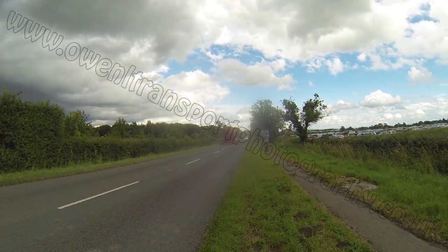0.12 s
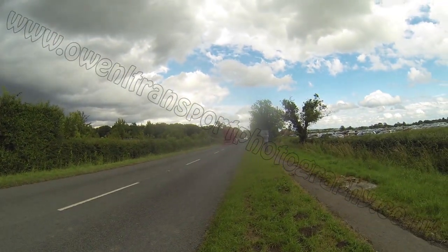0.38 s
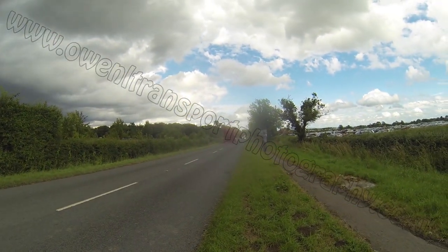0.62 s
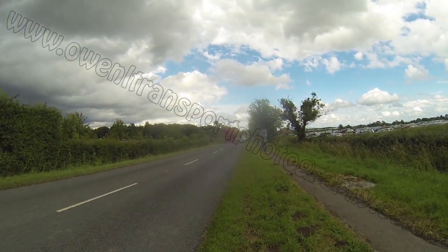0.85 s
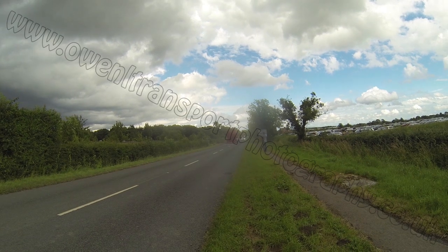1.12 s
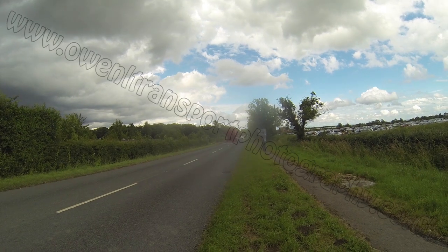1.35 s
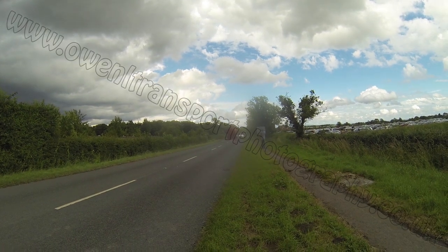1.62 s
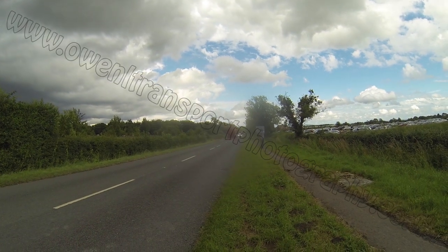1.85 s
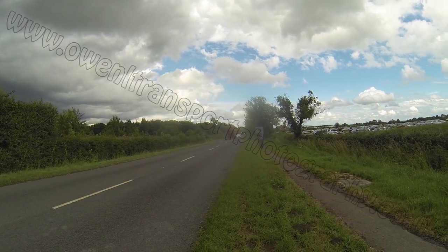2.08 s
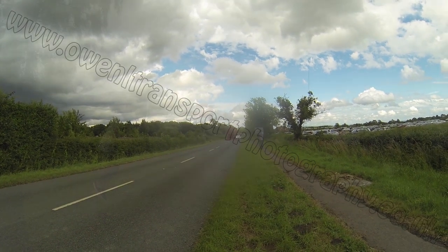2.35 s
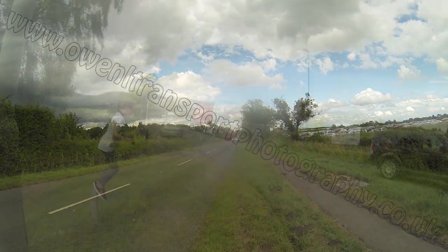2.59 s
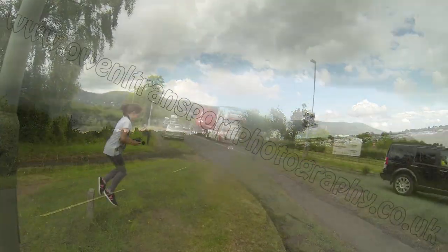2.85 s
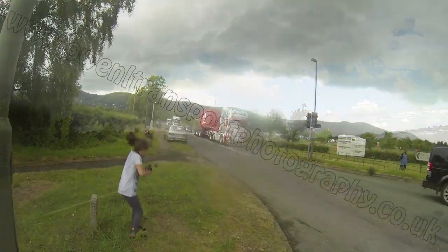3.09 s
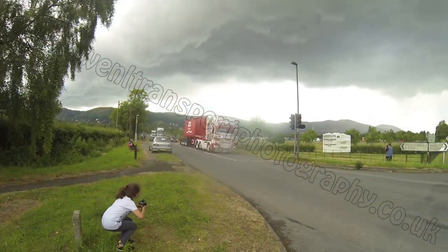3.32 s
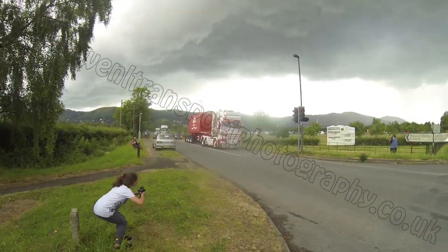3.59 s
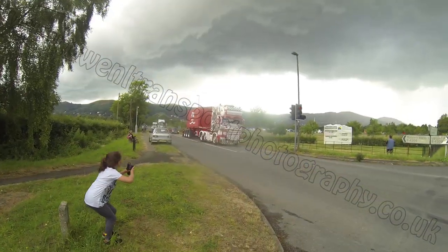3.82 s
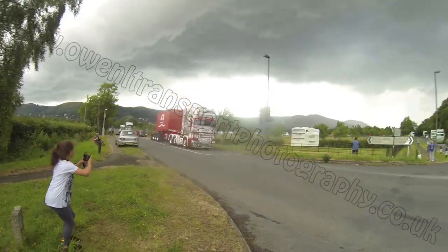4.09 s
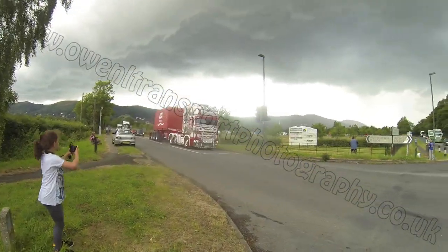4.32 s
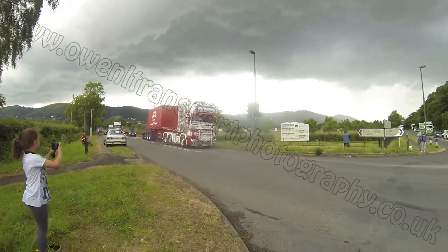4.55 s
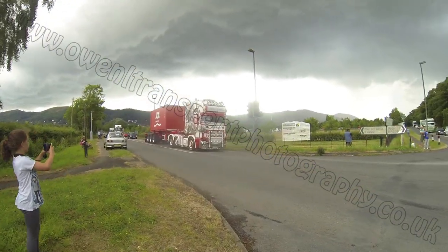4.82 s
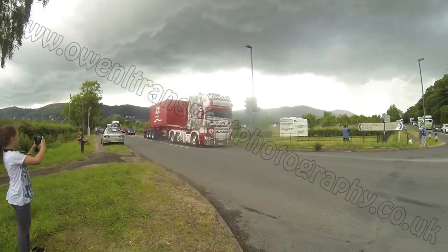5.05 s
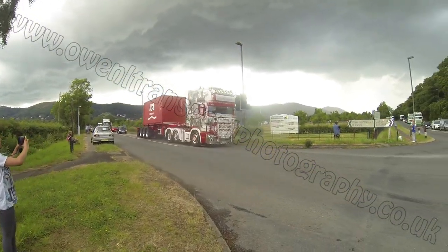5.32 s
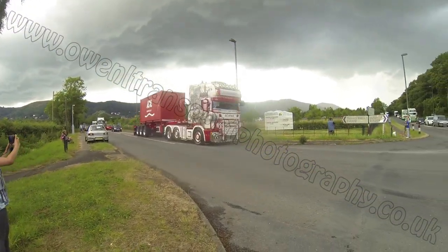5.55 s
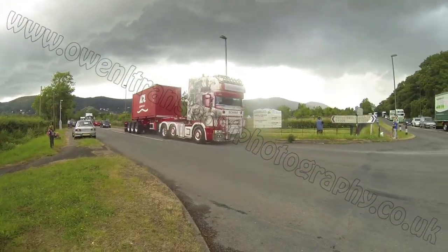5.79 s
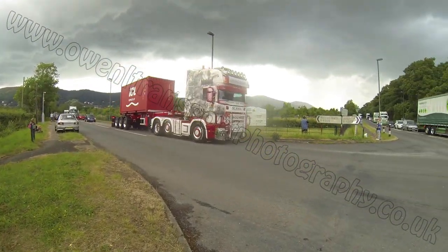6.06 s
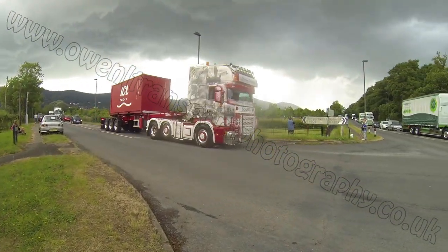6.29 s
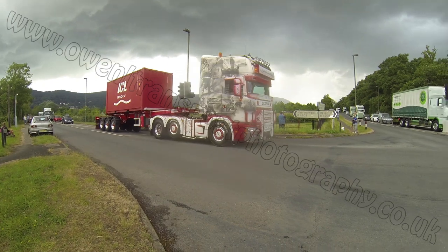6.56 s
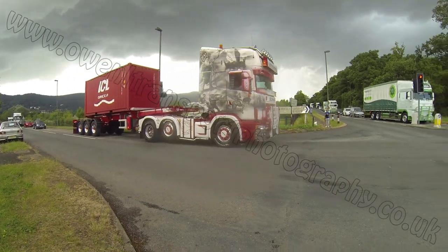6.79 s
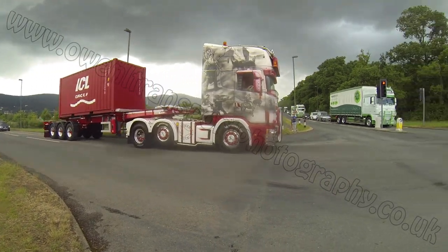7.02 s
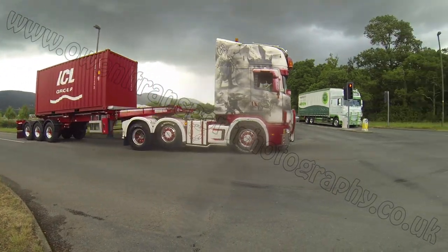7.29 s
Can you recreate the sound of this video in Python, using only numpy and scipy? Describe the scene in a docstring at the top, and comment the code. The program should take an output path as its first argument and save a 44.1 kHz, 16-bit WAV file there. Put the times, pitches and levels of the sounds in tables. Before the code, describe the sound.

Windy roadside with a vehicle rushing away, a brief silent gap, then a V8 diesel lorry pulls off close by, cracking, shifting and roaring again.

```python
"""Country verge, then a V8 lorry pulling off

A quiet verge: wind knocks on the microphone, far traffic and a vehicle rushing away are shaped noise,
and the ticks of a far engine ring two small resonances. After a short silence a V8 diesel lorry pulls off
close by, lifts off, blips the throttle, shifts with a puff of air and pulls again. Pressure fronts timed by
the crank ring its open exhaust stacks, three of the eight cracking sharply; tones locked to the crank hum
under them, and shaped noise makes the gas roar, hiss, hollow drones and turbocharger whoosh."""
import sys
import numpy as np
from scipy import signal
from scipy.fft import rfft, irfft, next_fast_len
from scipy.io import wavfile
from scipy.ndimage import uniform_filter1d, map_coordinates

SR = 44100
rng = np.random.default_rng(int(sys.argv[2]) if len(sys.argv) > 2 else 0)


def wav_record(signal):
    """Record a signal, one row per channel, as 16-bit PCM in the file named by sys.argv[1]."""
    frames = np.transpose(np.atleast_2d(signal))
    bounded = np.clip(frames, -1, 1)
    # unit amplitude maps onto the largest positive 16-bit level
    quanta = np.round(bounded * 32767).astype(np.int16)
    wavfile.write(sys.argv[1], SR, quanta)


def voltage_ratio(decibels):
    """Convert decibels (scalar or array-like) to amplitude ratios, 20 dB per decade."""
    exponent = np.asarray(decibels, float) / 20
    return 10 ** exponent


N = 326781


def unit(x):
    """Scaled to rms 1."""
    return x / np.sqrt(np.mean(x ** 2) + 1e-20)


def along(points, hz):
    """Reads (f/Hz, value) points on a log frequency axis."""
    f, v = np.transpose(points)
    return np.interp(np.log(hz + 1), np.log(f + 1), v)


def curves(rows):
    """One value per sample for each column after the time."""
    s, *cols = np.transpose(rows)
    return [np.interp(np.arange(N) / SR, s, c) for c in cols]


def swell(rows):
    """Gain of events that rise, hold and fall in straight dB lines."""
    t = np.arange(N) / SR
    gain = 0
    for full_at, hold, db, rise, fall in rows:
        before = np.clip(full_at - t, 0, None)
        after = np.clip(t - full_at - hold, 0, None)
        gain = gain + voltage_ratio(db - rise * before - fall * after)
    return gain


def wobble(rate):
    """A smooth random curve, rate knots a second."""
    return map_coordinates(rng.standard_normal(int(N * rate / SR) + 4), [np.arange(N) * rate / SR])


def filtered(x, response):
    """x times a complex response of frequency."""
    m = next_fast_len(N + SR // 2)
    return irfft(rfft(x, m) * response(np.fft.rfftfreq(m, 1 / SR)), m)[:N]


def modes(table):
    """Causal response of resonances: f/Hz, width/Hz, level/dB."""
    return lambda f: sum(voltage_ratio(db) * 1j * f * w / (c * c - f * f + 1j * f * w) for c, w, db in table)


def patchy_noise(spectrum, patchy_db, gate=1):
    """Coloured noise of rms 1 with patches of random gain in time and frequency."""
    z = signal.stft(gate * rng.standard_normal(N), nperseg=512)[2]
    field = uniform_filter1d(rng.standard_normal(z.shape), size=6, axis=0)
    field = uniform_filter1d(field, size=12, axis=1)
    x = signal.istft(z * voltage_ratio(patchy_db * unit(field)), nperseg=512)[1][:N]
    return unit(filtered(x, lambda hz: voltage_ratio(along(spectrum, hz))))


def fuzzy_tone(hz, blur, steady):
    """A tone of rms 1 whose size and phase wander blur times a second around a steady part."""
    turn = 2 * np.pi * np.cumsum(hz * np.ones(N)) / SR
    return unit((steady + wobble(blur)) * np.cos(turn) + wobble(blur) * np.sin(turn))


# wind colour: f/Hz, relative level per Hz/dB
WIND_COLOUR = [(12, -58), (20, 2.5), (39, -7.5), (125, -10), (168, -22.5), (300, -33.5), (400, -39),
               (520, -62), (880, -120)]
# gusts over the calm wind: t at full strength/s, hold/s, level/dB, rise/(dB/s), fall/(dB/s)
GUSTS = [(0, .4, -27, 50, 50), (.92, 0, -33, 130, 110), (2.26, .11, -38, 150, 110)]


def wind():
    """Turbulence buffets the microphone port, which rounds off the peaks."""
    calm_db = -30.5
    strength = (voltage_ratio(calm_db) + swell(GUSTS)) * voltage_ratio(0.8 * wobble(6) + 1.3 * wobble(22))
    return strength * np.tanh(0.77 * patchy_noise(WIND_COLOUR, patchy_db=-0.5)) / .5


# far traffic colour: f/Hz, relative level per Hz/dB
TRAFFIC_COLOUR = [(120, -6), (200, -10), (303, -9), (430, -14.5), (647, -9), (1540, -16.5), (1810, -19),
                  (2210, -19.5), (4090, -26), (7690, -42), (15000, -59.5)]


def traffic():
    """Far road noise, a coloured bed that drifts slowly in level."""
    return voltage_ratio(-42.5 + 0.67 * wobble(6.1)) * patchy_noise(TRAFFIC_COLOUR, patchy_db=0.5)


# ticks of one cycle of eight: relative level/dB
TICK_PATTERN = [0, -4, -3, -1, -3, -5, -4, -1]


def idling():
    """A far engine: ticks in a repeating pattern, each a 17 ms noise burst, ring two small resonances."""
    tick_hz, start_s = 40, .108
    count = int(PAUSE[0] * tick_hz) + 1
    beat = np.arange(count) - len(TICK_PATTERN) // 2
    luck = rng.standard_normal((count, 2))
    at = np.round((start_s + beat / tick_hz + .001 * luck[:, 0]) * SR).astype(int)
    tick_db = np.take(TICK_PATTERN, beat % len(TICK_PATTERN)) + 1.8 * luck[:, 1]
    ticks = np.bincount(at, voltage_ratio(tick_db), N)
    bursts = signal.fftconvolve(ticks, np.hanning(SR // 60), "same") * rng.standard_normal(N)
    ring = modes([(1810, 150, 8.0), (2010, 41, 4.9)])
    return voltage_ratio(-55.5) * unit(filtered(bursts, lambda f: ring(f) ** 2))


# vehicle rushing away, axle after axle: t at full strength/s, hold/s, level/dB, rise/(dB/s), fall/(dB/s)
AXLES = [(.06, 0.13, -26.5, 396, 27), (.355, 0.03, -33, 300, 150)]
# its colour: f/Hz, relative level per Hz/dB
PASSING_COLOUR = [(70, -22), (120, -2.5), (200, -5.5), (350, -15), (425, -8), (500, -19.5), (615, -8.5),
                  (700, -19), (900, -17), (1950, -18), (2350, -24.5), (3400, -27.5), (5300, -33),
                  (8000, -52.5), (11000, -103)]
# the treble flickers as it goes: t at full strength/s, hold/s, level/dB, rise/(dB/s), fall/(dB/s)
FLICKERS = [(.07, 0.28, -59.5, 899, 148), (.49, .03, -64.5, 301, 124), (.625, .01, -70, 200, 190)]
# colour of the flickers: f/Hz, relative level per Hz/dB
FLICKER_COLOUR = [(6000, -42), (8200, -3), (9200, 1), (10200, -12), (11000, -17), (12800, -16),
                  (15000, -40)]


def passing():
    """Rush of a receding vehicle: coloured noise swelling for each axle, with flickering treble."""
    body = swell(AXLES) * voltage_ratio(0.7 * wobble(30)) * patchy_noise(PASSING_COLOUR, patchy_db=1.3)
    return body + swell(FLICKERS) * patchy_noise(FLICKER_COLOUR, patchy_db=2.2)


# single wind knocks on the port: t/s, peak level/dB, width/s
KNOCKS = [(0.205, -13, 0.0017), (0.918, -15, 0.0061), (2.263, -21, 0.0013), (2.354, -15, 0.0038)]


def knocks():
    """Each knock is one push of pressure with a swing back either side."""
    t = np.arange(N) / SR
    total = 0
    for s, db, width in KNOCKS:
        u = (t - s) / width
        total = total - voltage_ratio(db) * (1 - u ** 2) * np.exp(-.5 * u ** 2)
    return total


# the vehicle's tyres sing: t at full strength/s, hold/s, level/dB, rise/(dB/s), fall/(dB/s)
SINGING = [(.38, 0.18, -48, 40, 40)]


def singing():
    """The tyres sing on as the vehicle leaves: a fixed pitch blurred in size and phase."""
    return swell(SINGING) * fuzzy_tone(1944, blur=350, steady=0)


def verge():
    """Wind, far traffic, a receding vehicle and a far idling engine."""
    return wind() + traffic() + idling() + passing() + knocks() + singing()


# lorry engine speed: t/s, firing rate/Hz
SPEED = [(2.85, 60.19), (3.2, 69.55), (3.5, 82.54), (3.8, 95.44), (4.1, 106.27), (4.35, 117.28),
         (4.55, 125.8), (4.68, 125.9), (5.0, 123.34), (5.36, 96.85), (5.5, 97.65), (5.65, 92.9),
         (5.8, 93.07), (6.0, 97.73), (6.3, 100.9), (6.5, 107.25), (6.8, 114.28), (7.1, 122.01),
         (7.41, 130.32)]


def crank():
    """Engine cycles completed, sample by sample: firing rate summed over time, eight firings a cycle."""
    start = .62  # crank position at the first speed row, in engine cycles
    running = np.arange(N) >= SPEED[0][0] * SR
    return start + np.cumsum(curves(SPEED)[0] * running) / SR / len(CYLINDERS)


# foot on the throttle: t down/s, t up/s, crack level at first/dB, at full boost/dB, boost time constant/s
PULLS = [(2.82, 4.71, -22, -8.5, 0.51), (5.354, 5.455, -9, -3, 0.052), (5.665, 7.5, -9, -6, 0.24)]


def fuel():
    """Pedal share 0-1 and the crack level in dB, which climbs as boost builds."""
    coast_db, pedal_s = -17, 0.024  # crack level with the foot off; how fast the fuel follows the pedal
    t = np.arange(N) / SR
    pedal, crack_db = 0, coast_db
    for on, off, first, full, build in PULLS:
        down = np.clip(np.minimum(t - on, off - t) / pedal_s + .5, 0, 1)
        boosted_db = full + (first - full) * np.exp(-np.clip(t - on, 0, None) / build)
        pedal = pedal + down
        crack_db = crack_db + down * (boosted_db - coast_db)
    return pedal, crack_db


def echoes(x):
    """Road, trailer and hedges send every crack back in the same short scatter."""
    t = np.arange(SR // 4) / SR
    tail = rng.standard_normal(len(t)) * voltage_ratio(-60 * t / 0.2) * (t > .002)
    return signal.fftconvolve(x, tail / np.linalg.norm(tail))[:N]


# firing order: place in the cycle/eighths, relative crack level/dB
CYLINDERS = [(0, 0), (.9, -15), (1.95, -14), (2.95, -20), (4.1, -2), (5.0, -3.5), (5.9, -17), (6.95, -16)]
# stacks swing round as the lorry turns: t/s, first, second, third crack level/dB (by place in the cycle:
# first half, fifth, rest), sharp tip level/dB, metal clatter level/dB, pipe ring level/dB
TURN = [(2.85, 0, 9, -1, -13, -51, -1), (3.7, 0, 3, -1, -6.5, -38, 9), (4.15, 0, 1.5, -1, -9, -46, 9),
        (4.6, -1.5, 2.5, -3.5, -10, -42, 6), (6.2, 0.8, 1.5, 3, -31, -35, 6.5),
        (6.9, -2, 0, 1, -19.5, -25, 8), (7.3, 2.5, -5, 2, -38, -30.5, 8)]
# cracks that rattle the stacks hardest: t/s
RATTLES = [6.654, 6.69, 6.797, 6.832, 6.866, 6.901, 7.069, 7.103, 7.262, 7.325]
# pipe resonances: f/Hz, width/Hz, relative level/dB
PIPE = [(151, 7.2, 2), (162, 11.6, 7.5), (288, 12.3, 3), (356.8, 30, 3), (438.5, 69, -3), (684, 140, -4.5),
        (1120, 370, -5.5)]


def exhaust(cycles):
    """Steep pressure fronts leave the stacks as narrow dips and ring the pipe; returns sound and gas puffs."""
    place, size_db = np.transpose(CYLINDERS)
    when = np.arange(int(cycles[-1]) + 1)[:, None] + place / len(CYLINDERS)
    keep = (when > cycles[0]) & (when < cycles[-1])
    cyl = np.nonzero(keep)[1]
    luck = rng.standard_normal((len(cyl), 3))  # timing, level and clatter of each firing
    at = np.interp(when[keep], cycles, np.arange(N)) + 3 * luck[:, 0]
    at = np.clip(np.round(at).astype(int), 0, N - 1)

    first_db, second_db, third_db, tip_db, clatter_db, ring_db = curves(TURN)
    half = len(CYLINDERS) // 2
    facing_db = np.select([cyl < half, cyl == half], [first_db[at], second_db[at]], third_db[at])
    crack_db = size_db[cyl] + fuel()[1][at] + 0.6 * luck[:, 1] + facing_db
    fronts = np.bincount(at, voltage_ratio(crack_db), N)

    t = np.arange(-300, 301) / SR
    bell = lambda centre, width: np.exp(-.5 * ((t - centre) / width) ** 2)
    spread = lambda shape: signal.fftconvolve(fronts, shape, "same")
    dips = -spread(0.66 * bell(0, 0.00027)) - voltage_ratio(tip_db) * spread(bell(0, 0.000093))
    rebound = voltage_ratio(-7.5) * spread(bell(.003, .001))  # the pressure swings back
    puffs = spread(bell(0, 0.00018) + 0.53 * bell(0.002, 0.0013))

    hard = np.min(np.abs(at[:, None] / SR - np.array(RATTLES)), axis=1) < .003
    uneven_db = np.where(hard, 11, 2.5 * luck[:, 2])  # hard rattles stand over the usual clatter
    ticks = np.bincount(at, fronts[at] * voltage_ratio(clatter_db[at] + uneven_db), N)
    clank = modes([(2560, 910, -1.8), (2790, 3000, -1.2), (4030, 2600, -1.8)])
    clatter = filtered(-ticks, lambda f: clank(f) ** 4)
    ringing = filtered(voltage_ratio(ring_db) * dips, modes(PIPE))
    return clatter + dips + rebound + ringing + voltage_ratio(-1.5) * echoes(dips), puffs


# how well the exhaust passes a clean tone: f/Hz, level/dB
PASSES = [(60, -34), (68, -27.5), (78, -17.5), (85, -21.5), (93, -22.5), (99, -26.5), (110, -16.5),
          (118, -25.5), (126, -25), (134, -12), (143, -20), (170, -17), (195, -36.5), (260, -45)]
# the lorry swings past, lifting the firing tone and its octave: t/s, gain/dB
NEAR = [(2.85, -1.5), (4.6, -1.5), (5.8, 5.5), (6.6, -0.5), (7.2, 10), (7.41, 0.5)]
# off the throttle the two banks pull unevenly and tones beside the firing pitch take over:
# t at full strength/s, hold/s, level/dB, rise/(dB/s), fall/(dB/s)
LOPE = [(4.7, 0.091, -34, 49, 12), (5.3, 0.027, -21.5, 86, 92), (5.6, 0.085, -25, 84, 196)]


def hum(cycles):
    """Tones locked to the crank, louder where the exhaust passes them; the firing tone lags at high speed."""
    octave_db, idle_db = -3, -16  # octave over the firing tone; firing tones with the foot off
    lag_from_hz, lag_per_hz = 104, .007  # lag in cycles of the firing tone for each Hz above this rate
    tone = lambda order, lead: -2 ** .5 * np.cos(2 * np.pi * (order * cycles + lead))
    hz = curves(SPEED)[0]
    gain_db = curves(NEAR)[0] + idle_db * (1 - fuel()[0])
    lead = 0.094 - lag_per_hz * np.clip(hz - lag_from_hz, 0, None)
    firing = voltage_ratio(gain_db + along(PASSES, hz)) * tone(order=8, lead=lead)
    octave = voltage_ratio(gain_db + octave_db + along(PASSES, 2 * hz)) * tone(order=16, lead=-0.22)
    uneven = swell(LOPE) * (tone(order=9, lead=-0.059) + voltage_ratio(-1.0) * tone(order=11, lead=-0.049))
    return firing + octave + uneven


# steady deep rumble: f/Hz, relative level per Hz/dB
GROUND_COLOUR = [(12, -20), (30, 0.5), (55, -1), (90, -19), (200, -100)]


def ground():
    """Steady deep rumble under the lorry: patchy low noise."""
    return voltage_ratio(-34) * patchy_noise(GROUND_COLOUR, patchy_db=3.0)


# gas and tyre flow: t/s, roar level before a 5 dB trim/dB, hiss level/dB
FLOW = [(2.86, -25, -50), (3.1, -21.5, -44.5), (3.44, -18, -42), (4.03, -16.5, -44), (4.23, -24, -50),
        (4.85, -25.5, -57.5), (5.05, -23, -58), (5.31, -22, -49), (5.4, -18, -46), (5.5, -22, -50),
        (5.72, -17.5, -44.5), (5.93, -20.5, -48), (6.09, -21, -50), (6.97, -26, -64), (7.39, -24.5, -56.5)]
# roar colour: f/Hz, relative level per Hz/dB
ROAR_COLOUR = [(25, -9), (50, -10), (80, -7), (130, 0), (240, -16), (320, -11), (430, -7.5), (560, -8.5),
               (900, -10.5), (1400, -16), (1900, -26), (3000, -29), (7000, -45.5), (12000, -89)]
# hiss colour: f/Hz, relative level per Hz/dB
HISS_COLOUR = [(1300, -39), (1800, 1), (2200, 3.5), (3000, -14), (5000, -15.5), (7000, -22.5),
               (10000, -22.5), (15000, -57)]


def roar_and_hiss(puffs):
    """Turbulent gas and tyre noise: the roar flares just behind each crack, the hiss rides on top."""
    roar_db, hiss_db = curves(FLOW)
    flare = 1 + 2.2 * np.roll(puffs, SR // 700)  # trails the front
    roar = voltage_ratio(roar_db - 5) * patchy_noise(ROAR_COLOUR, patchy_db=1.2, gate=flare)
    return roar + voltage_ratio(hiss_db) * patchy_noise(HISS_COLOUR, patchy_db=3.0)


# thin high hiss that swells and fades, then creeps back: t at full strength/s, hold/s, level/dB,
# rise/(dB/s), fall/(dB/s; negative goes on rising)
THIN_HISS = [(3.1, 0.78, -52.5, 20, 34), (5.95, 1, -60, 5, -2.5)]
# thin high hiss colour: f/Hz, relative level per Hz/dB
THIN_HISS_COLOUR = [(3500, -26), (5800, -0.5), (7500, -2), (9300, -3), (11200, -5), (15000, -11.5)]


def thin_hiss():
    """Thin treble noise that swells and fades, as from a car passing nearby, then creeps back."""
    return swell(THIN_HISS) * patchy_noise(THIN_HISS_COLOUR, patchy_db=2.5)


# hollow notes sag as the gas slows after lifting off:
# t/s, low note f/Hz, low note level/dB, high note f/Hz, high note level/dB
SAG = [(4.72, 385, -50, 500, -44), (4.82, 382, -42, 490, -37), (4.91, 377, -28, 443, -35),
       (5.04, 372, -29, 425, -34), (5.16, 363, -29, 432, -39), (5.28, 347, -30, 435, -39),
       (5.36, 345, -42, 435, -45)]


def sagging_notes():
    """Two hollow pipe notes sag in pitch as the gas slows, each blurred in size and phase."""
    low_hz, low_db, high_hz, high_db = curves(SAG)
    during = (np.arange(N) > SAG[0][0] * SR) & (np.arange(N) < SAG[-1][0] * SR)
    low = voltage_ratio(low_db) * fuzzy_tone(low_hz, blur=70, steady=1.5)
    high = voltage_ratio(high_db) * fuzzy_tone(high_hz, blur=90, steady=.3)
    return during * (low + high)


# low throb while coasting: t at full strength/s, hold/s, level/dB, rise/(dB/s), fall/(dB/s)
THROB = [(4.8, 1, -30, 60, 39)]


def throb():
    """A low blurred tone while coasting."""
    return swell(THROB) * fuzzy_tone(78.4, blur=35, steady=.6)


# turbocharger whoosh: t at full strength/s, hold/s, level/dB, rise/(dB/s), fall/(dB/s)
WHOOSH = [(5.2, 0.047, -62, 30, 10), (6.3, 0.49, -42.5, 30, 19)]
# the whoosh slides down: t/s, centre f/Hz, width/log units, lower band relative level/dB
TURBO = [(5.0, 7000, 0.16, -30), (5.6, 6250, 0.11, -24), (6.0, 4600, 0.25, -23), (6.2, 4200, 0.17, -18),
         (6.6, 4160, 0.15, -1), (6.85, 3900, 0.12, -3), (7.15, 3250, 0.25, 0), (7.41, 3020, 0.53, 0)]


def turbo_whoosh(puffs):
    """Two noise bands slide down together, chopped by the cracks ever harder from the last swell on."""
    chop_depth, chop_growth, lower_ratio = 1.3, 0.9, 0.73  # growth exponent per second; lower over upper pitch
    chop = chop_depth * np.exp(chop_growth * np.clip(np.arange(N) / SR - WHOOSH[-1][0], 0, None))
    hz, t, z = signal.stft((1 + chop * puffs) * rng.standard_normal(N), SR, nperseg=512)
    frame_at = np.clip((t * SR).astype(int), 0, N - 1)
    centre_hz, width, lower_db = (c[frame_at] for c in curves(TURBO))
    hump = lambda at_hz: np.exp(-.5 * (np.log((hz[:, None] + 1) / at_hz) / width) ** 2)
    band = hump(centre_hz) + voltage_ratio(lower_db) * hump(lower_ratio * centre_hz)
    band = band / np.sqrt(np.mean(band ** 2, axis=0))
    return swell(WHOOSH) * signal.istft(z * band, SR, nperseg=512)[1][:N]


# hollow low notes in the pipe, through the blip and into the second pull:
# t at full strength/s, hold/s, level/dB, rise/(dB/s), fall/(dB/s)
DRONE = [(5.38, 0.37, -31, 100, 60), (5.75, 0.071, -25, 85, 58)]


def hollow_drone():
    """Gas noise in the pipe sounds its hollow low notes, through the blip and into the second pull."""
    hollow = modes([(376.6, 38.0, 7.5), (413, 120, -25.0), (308, 36, 5.0)])
    return swell(DRONE) * unit(filtered(rng.standard_normal(N), lambda f: hollow(f) ** 2))


# gearbox air valve: t/s, hold/s, t60/s
VALVE = (5.472, .035, .15)


def air_puff():
    """The gearbox valve lets out a jet of bright noise that holds, then dies away."""
    start, hold, t60 = VALVE
    since = np.arange(N) / SR - start
    burst = (since > 0) * voltage_ratio(-46.5 - 60 * np.clip(since - hold, 0, 1) / t60)
    jet = [(5000, -30), (7000, -5), (7800, -3.5), (9000, -12), (15000, -12.5)]  # f/Hz, level per Hz/dB
    return burst * unit(filtered(rng.standard_normal(N), lambda f: voltage_ratio(along(jet, f))))


def lorry():
    """One crank drives the cracks and the hum; their gas puffs shape the roar and whoosh around them."""
    cycles = crank()
    pipe, puffs = exhaust(cycles)
    flow = ground() + roar_and_hiss(puffs) + thin_hiss() + sagging_notes() + throb()
    flow = flow + turbo_whoosh(puffs) + hollow_drone() + air_puff()
    return pipe + hum(cycles) + flow


# silence between the two places: t start/s, t end/s
PAUSE = (2.767, 2.851)


def scene():
    """The verge, a gap, then the lorry fading in over 10 ms."""
    t = np.arange(N) / SR
    fade_in = np.clip((t - PAUSE[1]) / 0.0098, 0, 1)
    return (verge() * (t < PAUSE[0]) + lorry() * fade_in)[None]


def band_limit(x):
    """A steep low-pass at the top of the band."""
    return signal.sosfilt(signal.butter(12, 15170, fs=SR, output="sos"), x)


def record(dry):
    """The microphone drops the deepest bass and the top treble; the loudest cracks flatten near full scale."""
    top, low_hz, high_hz = .99, 18, 15170
    heard = filtered(dry[0], lambda f: (f < high_hz) * 1j * f / (low_hz + 1j * f))
    clipped = heard / (1 + np.abs(heard / top) ** 40) ** (1 / 40)
    return band_limit(clipped[None])


dry = scene()
out = record(dry)
wav_record(out)
```